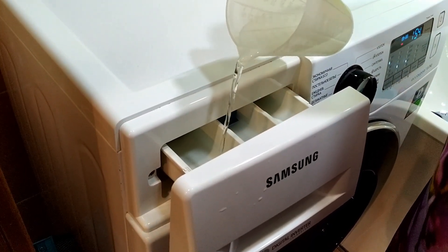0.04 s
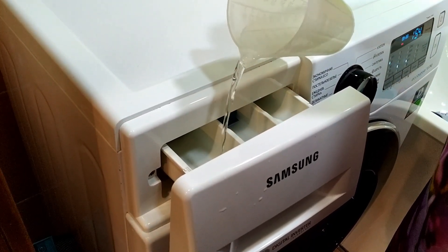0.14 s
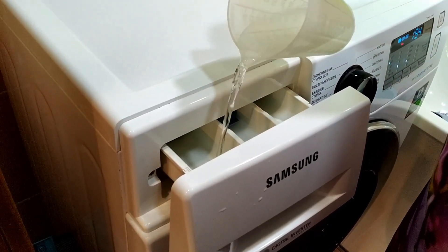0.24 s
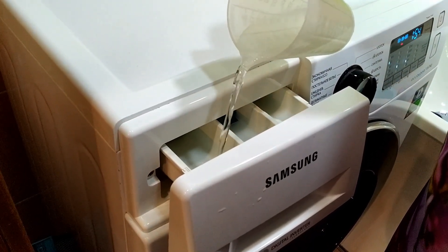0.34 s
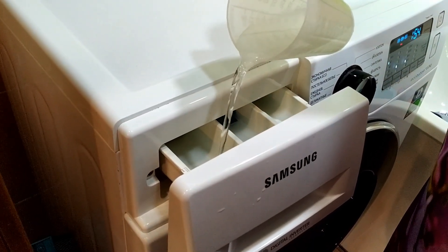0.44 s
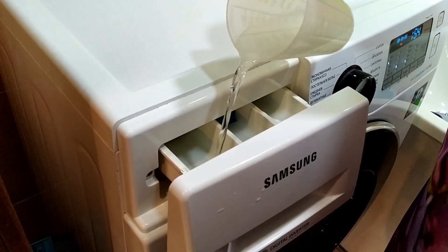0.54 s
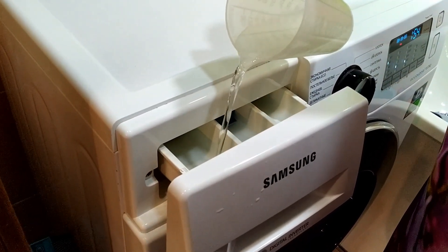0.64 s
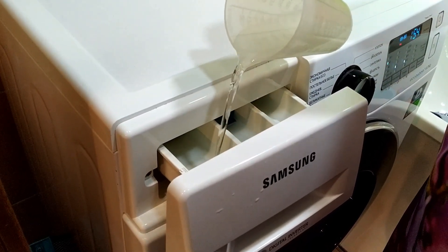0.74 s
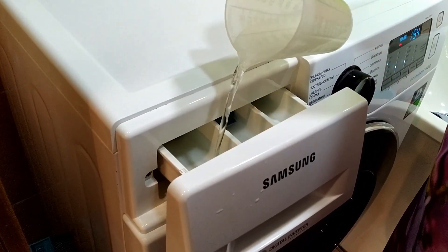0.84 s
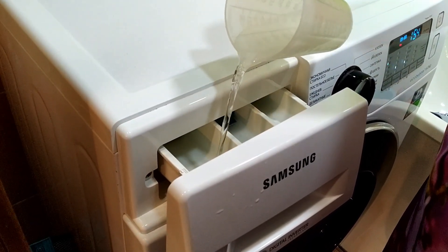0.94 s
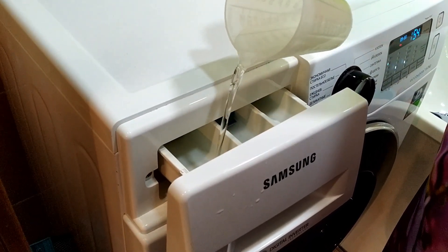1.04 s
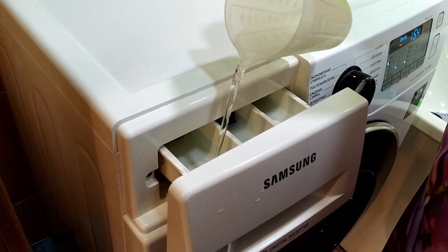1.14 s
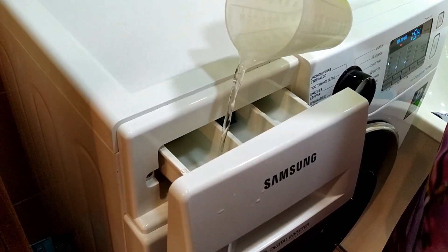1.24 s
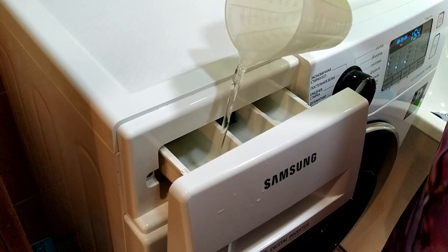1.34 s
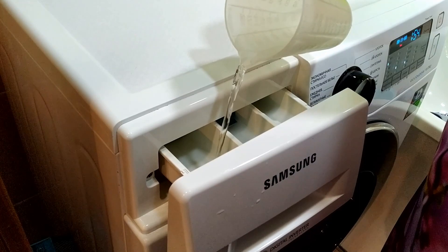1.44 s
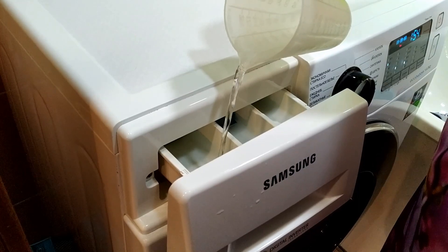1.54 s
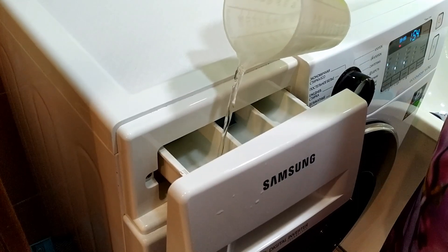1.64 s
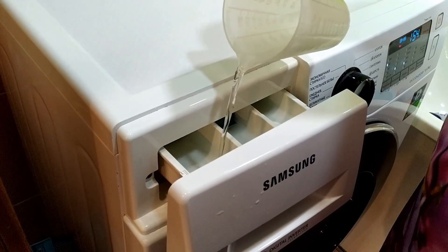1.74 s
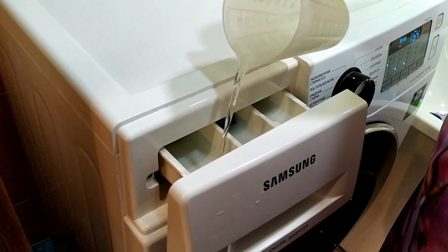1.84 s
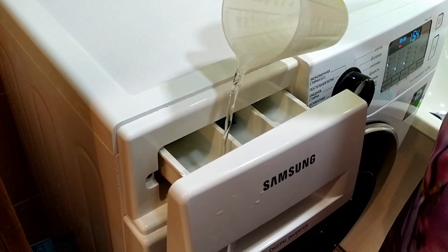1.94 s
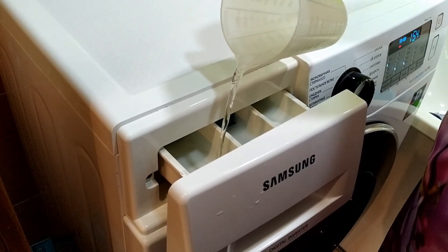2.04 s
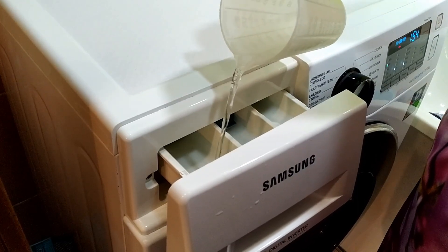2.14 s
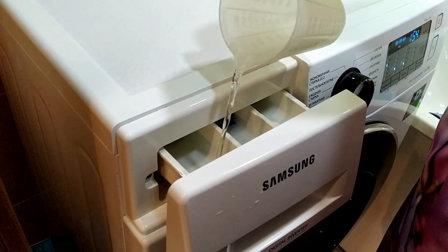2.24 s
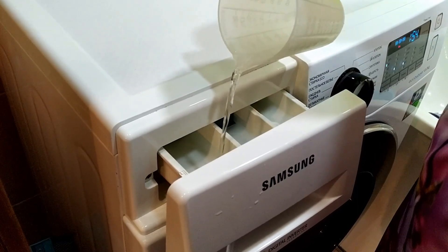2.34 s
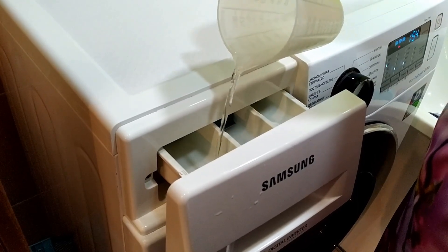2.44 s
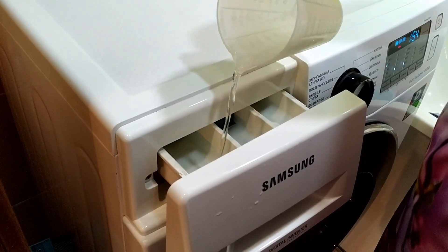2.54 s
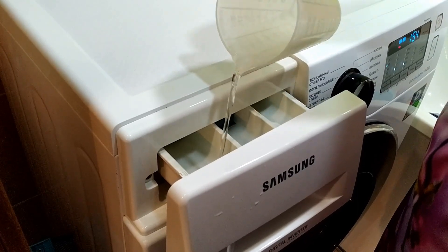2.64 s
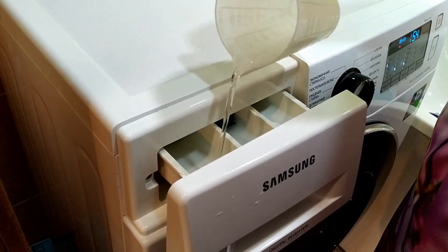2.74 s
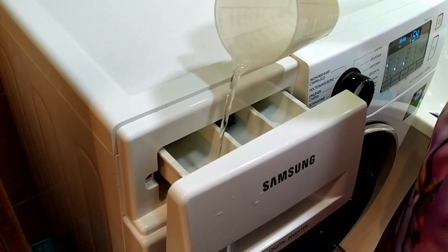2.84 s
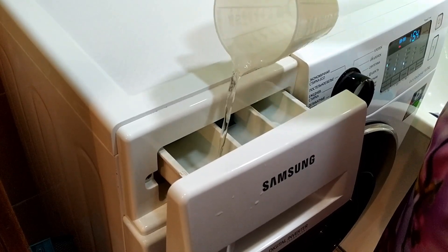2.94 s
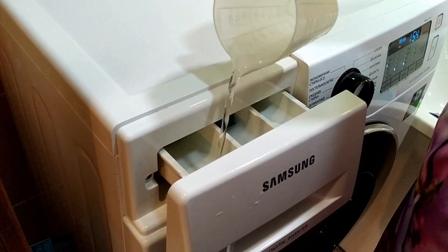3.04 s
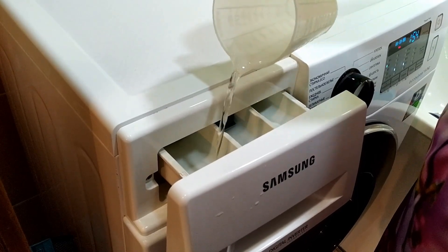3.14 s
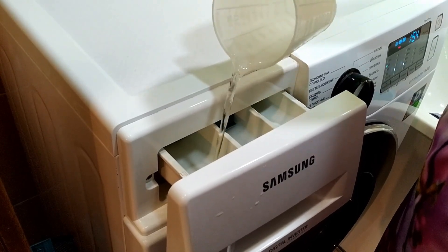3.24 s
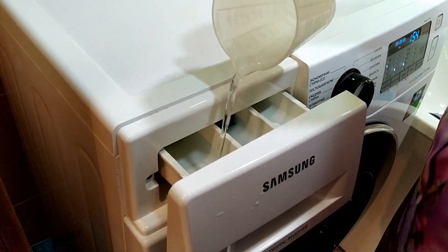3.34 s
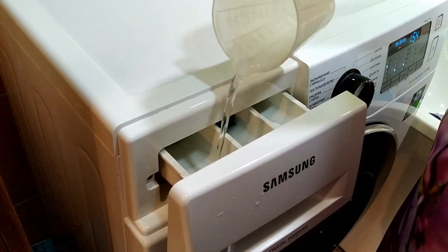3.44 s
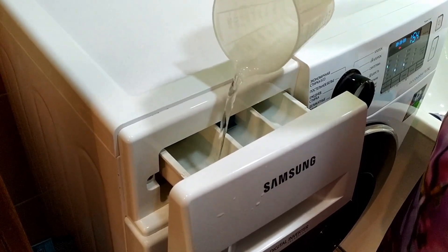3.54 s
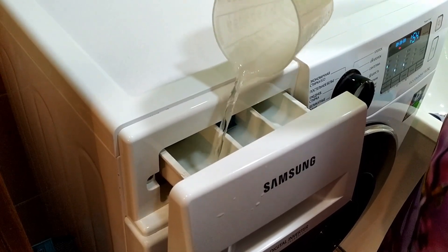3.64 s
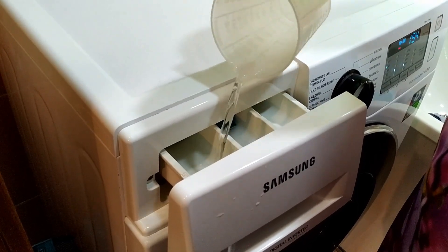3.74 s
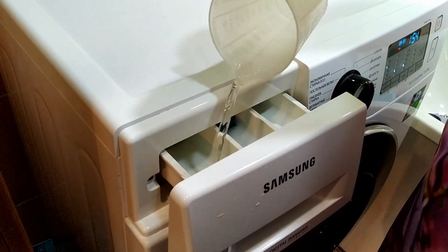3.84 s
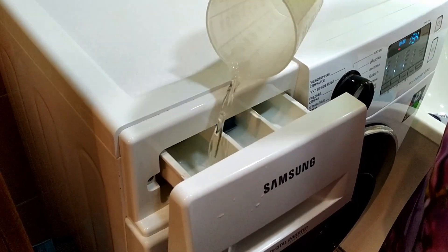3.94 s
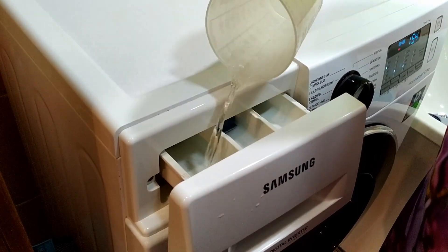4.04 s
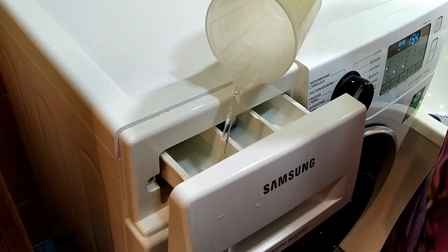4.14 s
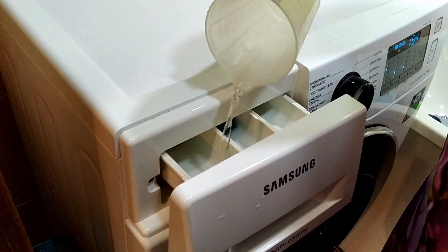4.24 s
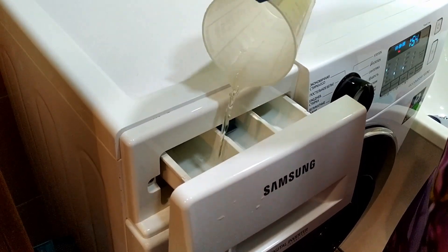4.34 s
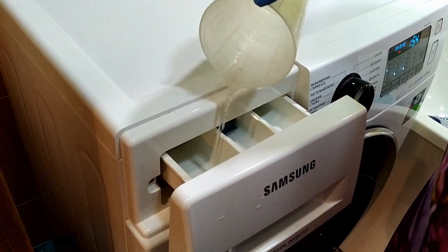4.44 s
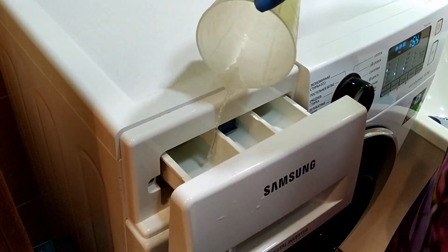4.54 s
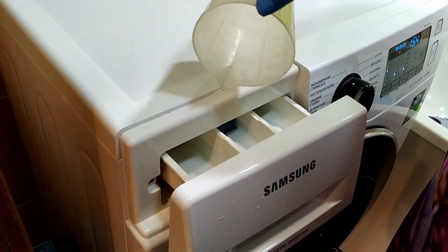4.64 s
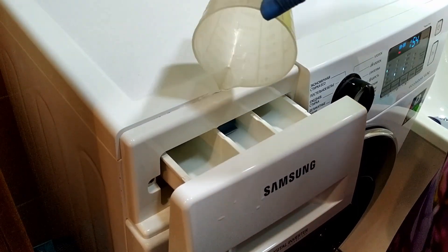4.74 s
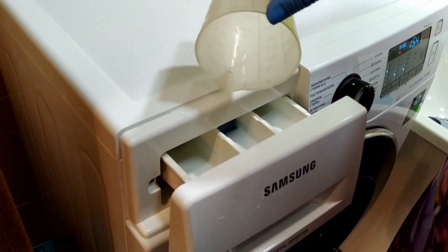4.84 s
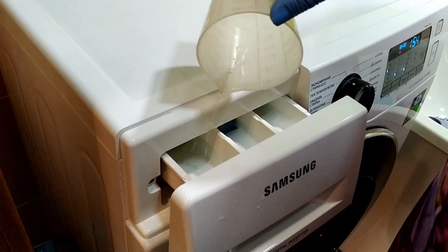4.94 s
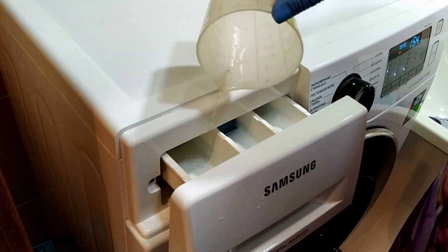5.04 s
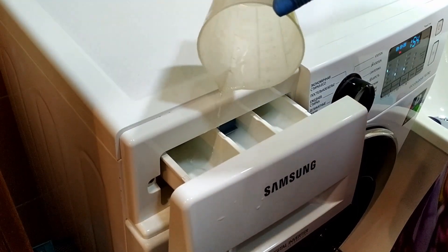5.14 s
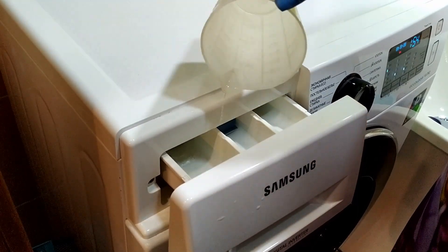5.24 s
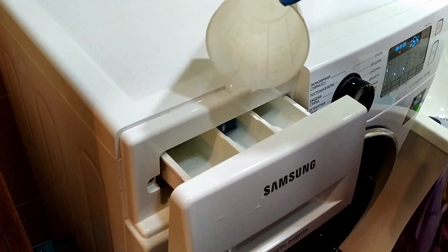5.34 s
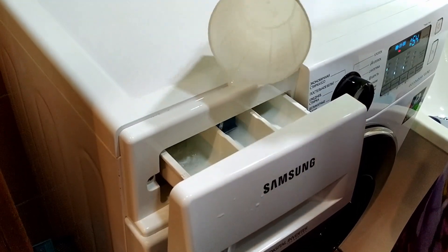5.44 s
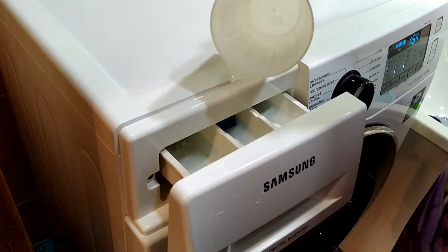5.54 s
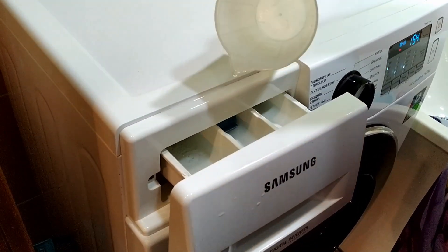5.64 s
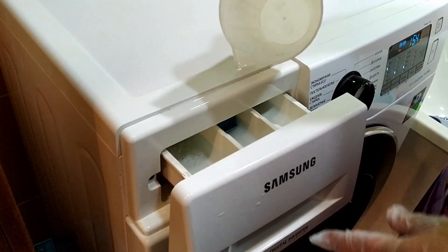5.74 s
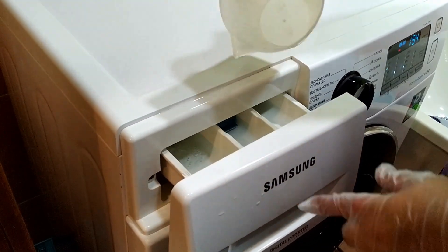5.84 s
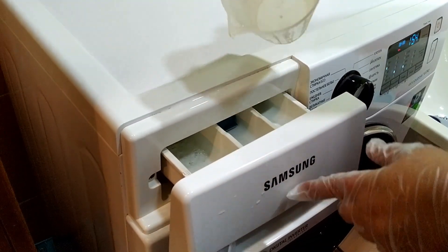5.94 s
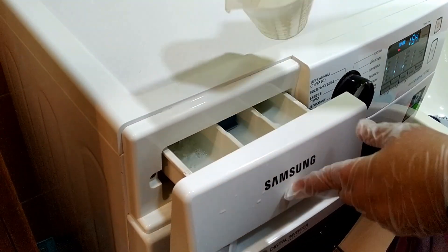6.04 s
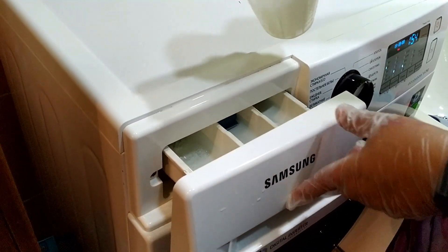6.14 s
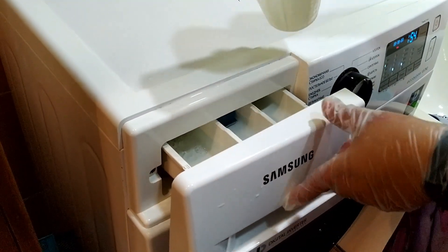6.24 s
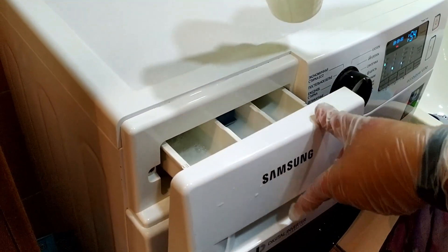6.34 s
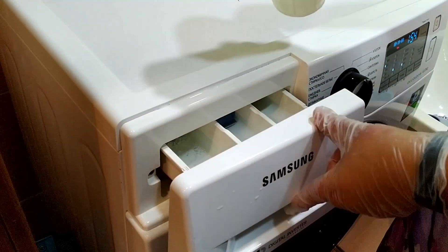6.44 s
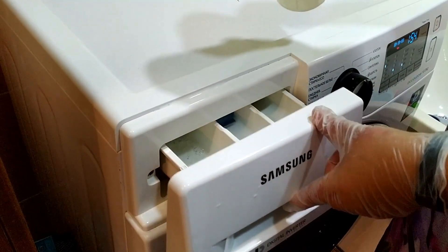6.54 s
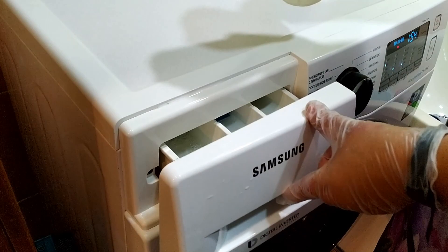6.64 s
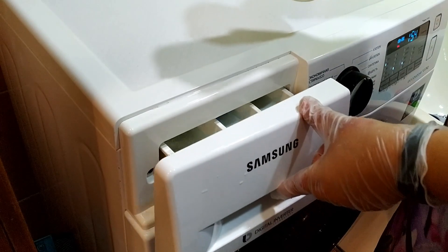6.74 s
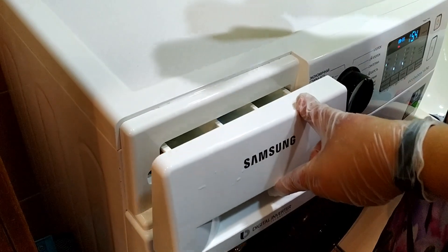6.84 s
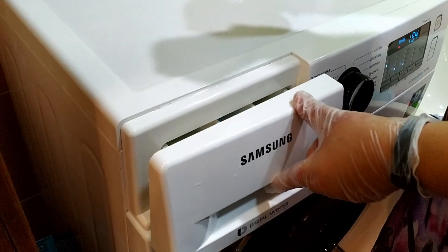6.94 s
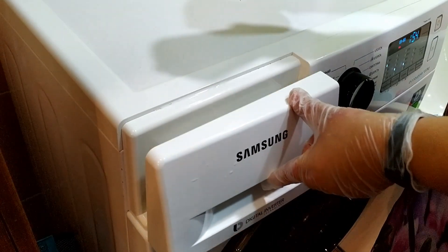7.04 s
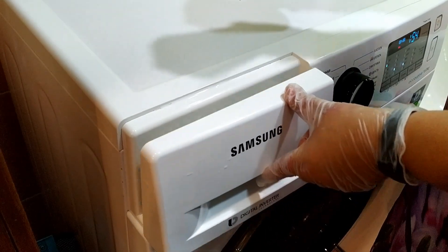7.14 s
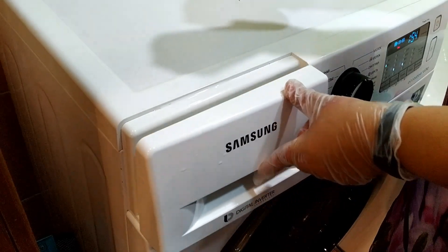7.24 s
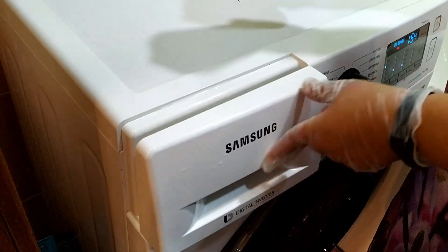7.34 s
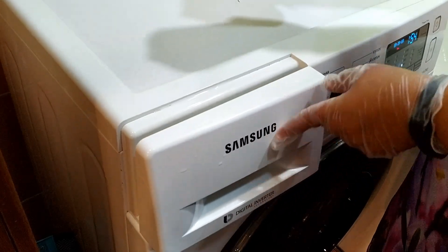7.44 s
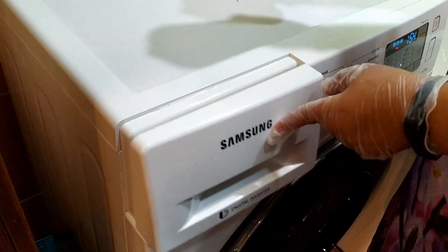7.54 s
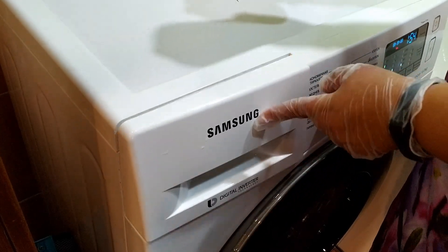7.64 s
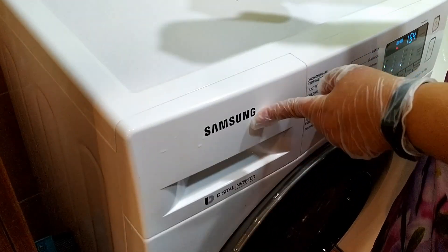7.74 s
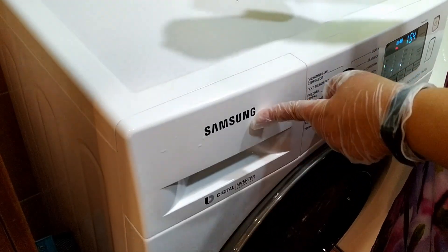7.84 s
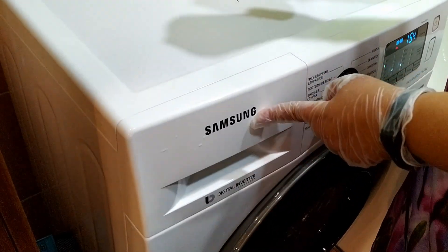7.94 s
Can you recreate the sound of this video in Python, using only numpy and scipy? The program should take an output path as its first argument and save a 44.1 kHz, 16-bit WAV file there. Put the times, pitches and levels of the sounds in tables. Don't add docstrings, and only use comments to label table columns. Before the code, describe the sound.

Close stereo pickup beside a washing machine: soft hum and low rumble, faint pattering drips and little plinking bubbles, becoming busier with short hissing spurts. Around the middle, dull bumps lead into a bright, sputtering rush of water with hollow gulps and sharp splashes. At the end the plastic drawer slides home, knocking and snapping loudly while the steel body thuds, with a short room echo.

```python
import sys
import numpy as np
from scipy import signal
from scipy.fft import rfft, irfft, next_fast_len
from scipy.io import wavfile
from scipy.ndimage import uniform_filter1d, map_coordinates

SR = 44100
rng = np.random.default_rng(int(sys.argv[2]) if len(sys.argv) > 2 else 0)


def gain_from_db(level_db):
    decades = np.asarray(level_db, float) / 20
    return 10 ** decades


def persist_wave(psi):
    counts = np.round(np.clip(psi, -1, 1) * 32767).astype(np.int16)
    wavfile.write(sys.argv[1], SR, np.atleast_2d(counts).T)


N = 352799

# [t/s, level/dB]
RUSH = [
    (4.88, -76),
    (4.95, -60),
    (4.965, -47),
    (5.12, -41),
    (5.85, -41.5),
    (6.72, -41.5),
    (7.2, -45),
    (7.55, -45.5),
    (7.69, -47),
]
# [f/Hz, width/Hz, level/dB]
PIPES = [(401, 16.3, 0), (806, 59, 0)]
# [t/s, level/dB]
LOW_GULPS = [
    (5.23, -40.5),
    (5.6, -45),
    (6.66, -46.5),
    (7.4, -50),
]
HIGH_GULPS = [
    (5.32, -47.5),
    (5.6, -54),
    (6.72, -46),
    (7.15, -45.5),
    (7.55, -49),
]
SONG_UNDER_DB = [-17, -14]
# [f/Hz, width/Hz, level/dB]
BINS = [(1390, 56, 8), (1750, 18, 6.5), (2008, 32, 0), (2140, 36, -3), (2350, 91, -3.5), (2483, 33, -2),
        (3940, 130, 0.5)]
# [f/Hz, width/Hz, level/dB]
TRAY = [(135, 17, -5.5), (212, 86, -6.5), (309.5, 54, -1), (655, 37, -8.5), (957, 45, -11),
        (200.4, 6, -7.5)]
# [f/Hz, density/dB per Hz]
SPLASH = [(530, -30), (900, -5), (1100, -5), (1500, -12.5), (1710, 0.5), (1900, -4), (2070, 1.5),
          (2410, -1.5), (3030, -3.5), (3530, -7.5), (3940, -5), (5200, -10), (6000, -6), (7800, -2),
          (13200, -120)]
FIZZ = [(2650, -12), (4500, -4), (5260, -6), (6430, -4.5), (7120, -6), (9870, 1), (11800, -9.5),
        (14200, -13), (14600, -49), (15000, -44)]
# [t/s, level/dB, rise/s, fall/s]
BURSTS = [
    (5.3, -44.5, 0.065, 0.092),
    (6.12, -39, 0.023, 0.059),
    (6.99, -41, 0.017, 0.043),
    (7.51, -46, .03, .05),
]
# [t/s, level/dB, f/Hz]
SPLASHES = [(5.0115, -28, 1750), (5.027, -21, 1390), (5.0573, -26.5, 1390), (5.1394, -26, 2140),
            (5.2088, -30.5, 2270), (5.2576, -31, 2350), (5.343, -30, 1790), (5.4566, -26.5, 2140),
            (5.7956, -32, 2300), (5.9092, -28, 2140), (6.0718, -24, 2030), (6.111, -23, 2295),
            (6.16, -27.5, 2070), (6.211, -31, 2160), (6.2389, -24.5, 1960), (6.2833, -25.5, 2280),
            (6.3157, -28, 2030), (6.3552, -26, 1676), (6.3791, -36, 2140), (6.4062, -26, 2350),
            (6.4938, -28, 2300), (6.533, -24, 2110), (6.6275, -23.5, 2190), (6.862, -30.5, 1750),
            (7.0152, -27, 1973), (7.0576, -32.5, 2480), (7.1469, -28, 1700), (7.19, -29, 2460),
            (7.2377, -27.5, 2320), (7.5016, -33.5, 2040)]
SLOPS = [(4.9872, -34, 2190), (5.0978, -29.5, 2090), (5.236, -32, 2460), (5.3063, -30.5, 2280),
         (5.44, -34, 2140), (5.5209, -33, 2070), (5.5462, -27.5, 1700), (5.726, -40, 1760),
         (5.7359, -36, 1750), (5.8325, -29.5, 2340), (5.88, -32, 2350), (5.9534, -27, 2410),
         (5.978, -32, 2370), (6.0062, -40, 2290), (6.029, -37, 2140), (6.3044, -32, 2050),
         (6.4368, -30, 2110), (6.5774, -32, 2350), (6.675, -29, 2280), (6.7055, -26, 2010),
         (6.7424, -30, 2520), (6.8848, -26.5, 2050), (6.9262, -37, 1800), (6.9701, -29, 1960),
         (7.2754, -31.5, 2440), (7.311, -31, 2510), (7.3976, -32, 2460), (7.577, -34, 2390),
         (7.607, -35.5, 2050)]
SPITS = [(4.965, -34, 9500), (5.086, -33, 9450), (5.1816, -31, 4210), (5.207, -27, 8500),
         (5.2362, -26, 9900), (5.5903, -22.5, 9900), (5.766, -22, 9800), (5.9115, -22.5, 9360),
         (6.0283, -23.5, 9800), (6.095, -28, 9800), (6.1123, -28, 10000), (6.1608, -19, 7830),
         (6.262, -27, 4110), (6.5328, -26, 8060), (6.624, -27, 9800), (6.739, -21, 9800),
         (7.2083, -25, 9560), (7.4104, -26.5, 9850), (7.4821, -26, 9960), (7.512, -20.5, 10230),
         (7.593, -25, 9660), (7.711, -14, 10200), (7.712, -11, 7820), (7.792, -11.5, 10260)]
# [f/Hz, likeness]
ALIKE_RUSH = [(60, 0.77), (150, 0.97), (380, 0.94), (940, 0.46), (2350, 0.089), (5870, -0.031),
              (14700, -0.049)]
FULL_FLOW_DB = -41
GURGLE_DB, GURGLE_FOLLOWS = -50.5, 0.23
FIZZ_FOLLOWS, FIZZ_DRIES_DB_PER_S = 1, 0.53
GULP_RISE_S, GULP_FALL_S = 0.14, 0.14
SPLASH_T60_S, SPIT_T60_S = 0.029, 0.03


def flood():
    splash_db, = curves(RUSH, off_db=-200)
    swing_db = splash_db - FULL_FLOW_DB
    since = np.arange(N) / SR - RUSH[0][0]
    gurgle_db = GURGLE_DB + GURGLE_FOLLOWS * swing_db
    fizz_db = FULL_FLOW_DB + 1.2 + FIZZ_FOLLOWS * swing_db - FIZZ_DRIES_DB_PER_S * since
    surge = 1.6 * wobble(16)
    gurgle = gain_from_db(gurgle_db + 3.0) * rush(modes(TRAY), ALIKE_RUSH, patchy_db=3.0, size=1024)
    song = 0
    for gulps, under_db, pipe in zip([LOW_GULPS, HIGH_GULPS], SONG_UNDER_DB, PIPES):
        gulping = swells([(*gulp, GULP_RISE_S, GULP_FALL_S) for gulp in gulps])
        gain = np.hypot(gain_from_db(splash_db + under_db), gulping)
        song = song + gain * paired(rng.standard_normal((2, N)), modes([pipe]), ALIKE_RUSH)
    walled = lambda hz: colour(SPLASH)(hz) * (0.53 + modes(BINS)(hz))
    splash = gain_from_db(splash_db - 4.0 + surge) * rush(walled, ALIKE_RUSH, patchy_db=2.0, grain_db=4.0)
    fizz_gain = np.hypot(gain_from_db(fizz_db - 0.5 + 0.42 * surge), swells(BURSTS))
    fizz = fizz_gain * rush(colour(FIZZ), ALIKE_RUSH, patchy_db=0.0, grain_db=3.0)
    crowd = swarm(splash_db - 4, 5.9, 7.6, count=600, centre_hz=2150, spread=0.148, cycles=24)
    small = pings(crowd, rise=0.053, attack=0.67, rough=0.63, apart=1.5)
    splashes = pings(lasting(SPLASHES, SPLASH_T60_S), rise=0.041, attack=1.6, rough=0.65, apart=0.35,
                     crack_db=-18)
    spits = pings(lasting(SPITS, SPIT_T60_S), rise=0.045, attack=3.6, rough=0.4, apart=1.4)
    slops = pings(lasting(SLOPS, SPLASH_T60_S), rise=0.051, attack=2.1, rough=0.75, apart=0.35)
    spikes = gain_from_db(1.5) * splashes + gain_from_db(-2.0) * spits + small + gain_from_db(-1.5) * slops
    return gurgle + song + splash + fizz, spikes


# [t/s, level/dB]
STREAM = [
    (0, -75),
    (1.35, -78.5),
    (1.5, -72),
    (3.0, -69.5),
    (3.9, -72),
    (4.95, -62),
]
# [t/s, level/dB, rise/s, fall/s]
SPURTS = [
    (1.45, -67, 0.04, 0.16),
    (2.3, -68, 0.078, 0.52),
    (3.27, -59.5, 0.014, 0.3),
    (3.555, -46, 0.0075, 0.057),
    (4.3, -54.5, 0.14, 0.11),
    (4.6, -50.5, 0.022, 0.095),
    (4.94, -66, 0.12, 0.091),
]
# [f/Hz, density/dB per Hz]
PATTER = [(530, -24), (900, 8.5), (1180, -23), (1740, -5), (3370, -1), (3630, -25), (4500, -39),
          (5850, -35), (9900, -120)]
# [t/s, level/dB, f/Hz]
DROPS = [(0.5544, -41, 9800), (0.7328, -51, 10200), (0.9243, -50, 9610), (0.99, -40, 6440),
         (1.2431, -51, 9600), (1.2978, -43, 10950), (1.3584, -39.5, 9600), (1.4215, -40.5, 5400),
         (1.4796, -46.5, 8100), (1.5898, -51, 9800), (1.8472, -44.5, 8260), (1.889, -42, 4900),
         (2.0422, -43.5, 6200), (2.1984, -50, 9800), (2.2374, -40, 9600), (2.323, -45, 8200),
         (2.4274, -43, 9800), (2.493, -50, 7200), (2.685, -43, 8170), (2.9782, -50, 10300),
         (3.1168, -38, 8200), (3.2503, -46.5, 4700), (3.4107, -38.5, 9560), (3.516, -52, 10800),
         (3.5479, -43, 10040), (3.796, -50, 9820), (3.9077, -32.5, 7910), (3.988, -38, 11740),
         (4.023, -44, 11800), (4.0662, -48, 10240), (4.0822, -34.5, 10000), (4.1203, -39, 10000),
         (4.1485, -36.5, 12760), (4.208, -45, 8400), (4.2433, -40, 7060), (4.3226, -40, 11960),
         (4.3451, -36, 8300), (4.4409, -46, 5600), (4.4848, -43.5, 10400), (4.5292, -40.5, 7650),
         (4.601, -46, 10200), (4.7701, -43, 10900), (4.9223, -35, 8600), (4.9637, -40, 9970)]
BUBBLES = [(0.079, -46, 2650), (1.4212, -53, 2460), (1.4416, -50, 2150), (2.2366, -46, 1664),
           (2.3196, -49.5, 1410), (2.4277, -45.5, 1390), (2.6838, -51, 1610), (2.977, -53, 1720),
           (3.1173, -43.5, 1590), (3.25, -44, 1630), (3.5478, -52, 2150), (3.8184, -47.5, 2500),
           (3.911, -48, 3500), (3.9316, -43.5, 1580), (4.024, -50, 3200), (4.0901, -47, 2280),
           (4.1185, -47.5, 2350), (4.178, -43.5, 1890), (4.2388, -52, 2320), (4.2694, -42.5, 1870),
           (4.358, -39.5, 1750), (4.442, -47, 2860), (4.5331, -49, 1310), (4.561, -45, 1740),
           (4.601, -46, 1660), (4.6389, -47, 2820), (4.6864, -41.5, 1415), (4.7212, -46, 2220),
           (4.7731, -44.5, 2050), (4.8933, -51, 1300)]
DRIPS = [(1.481, -53, 1510), (1.7544, -55, 2840), (1.8028, -58, 2360), (1.8881, -55, 1000),
         (1.975, -53, 2390), (2.1645, -59, 1590), (2.1874, -54, 1710), (2.2628, -54, 1630),
         (2.2794, -58, 2070), (2.3655, -53, 2100), (2.4444, -54, 1710), (2.4634, -54, 1100),
         (2.4894, -57, 1110), (2.579, -54, 1390), (2.6294, -52, 1410), (2.7023, -49, 1370),
         (2.7194, -62, 1830), (2.813, -54, 1420), (2.835, -57, 1420), (2.8744, -59, 1720),
         (2.9153, -58, 1610), (3.0275, -53, 1700), (3.357, -52, 1130), (3.3845, -52, 1010),
         (3.4093, -50.5, 1720), (3.5623, -48, 2100), (3.6885, -55, 2140), (3.7229, -60, 2350),
         (3.7609, -57, 2340), (3.7953, -56, 2630), (3.9898, -54, 2640), (4.0652, -55, 2080),
         (4.15, -52, 1820), (4.345, -50, 1820), (4.4852, -50, 1730), (4.6608, -56, 1700),
         (4.7575, -48, 2100), (4.8564, -57, 1660), (4.91, -44, 1240)]
MIST_DB, MIST_FOLLOWS = -65.5, 0.015
SPURT_PATTER_DB = -4
DROP_T60_S, BUBBLE_T60_S, DRIP_T60_S = 0.026, 0.034, 0.025


def trickle():
    stream_db, = curves(STREAM, off_db=-120)
    spurt = swells(SPURTS)
    running = stream_db > -100
    fizz = np.hypot(gain_from_db(MIST_DB + MIST_FOLLOWS * (stream_db - STREAM[0][1])), spurt) * running
    patter = np.hypot(gain_from_db(stream_db), gain_from_db(SPURT_PATTER_DB) * np.minimum(spurt, gain_from_db(-59.5)))
    spray = gain_from_db(-3.0) * fizz * rush(colour(FIZZ), ALIKE_AIR, patchy_db=2.2, grain_db=2.8)
    spray = spray + gain_from_db(-8.0) * patter * rush(colour(PATTER), ALIKE_AIR, patchy_db=0.5, grain_db=5.0)
    crowd = swarm(20 * np.log10(patter) + 9, 0, 4.9, count=120, centre_hz=1590, spread=0.29, cycles=30)
    small = pings(crowd, rise=0.08, attack=0.59, rough=0.7, apart=1.2, crack_db=-12)
    drops = pings(lasting(DROPS, DROP_T60_S), rise=0.043, attack=0.88, rough=0.63, apart=2.4,
                  crack_db=-24.5)
    drips = pings(lasting(DRIPS, DRIP_T60_S), rise=0.049, attack=0.6, rough=0.68, apart=0.7, crack_db=-11)
    bubbles = pings(lasting(BUBBLES, BUBBLE_T60_S), rise=0.089, attack=0.85, rough=0.69, apart=0.4,
                    crack_db=-12)
    return spray, gain_from_db(1.0) * drips + small + gain_from_db(2.0) * drops + gain_from_db(-1.0) * bubbles


# [t/s, panel blow/dB, clatter/dB, clatter t60/s, dull above f/Hz]
SHUT = [
    (7.622, -29, -40, 0.22, 2000),
    (7.646, -24, -27.5, 0.38, 3120),
    (7.683, -14, -27.5, 0.2, 1510),
    (7.691, -21, -27, 0.08, 7000),
    (7.6995, -11.5, -12.5, 0.076, 9350),
    (7.712, -12, -18.5, 0.12, 12400),
    (7.79, -40, -9, 0.045, 13800),
    (7.806, -20.5, -24.5, 0.2, 11800),
    (7.848, -22, -33.5, 0.25, 5000),
    (7.901, -43, -62, 0.19, 2950),
]
# [f/Hz, level/dB, t60/s]
PANEL = [(45.9, -30, 0.86), (72, -28, 1), (131, -11, 0.28), (193.4, -13.5, 0.34), (235, -6, 0.081),
         (294.3, 2, 0.078), (395, -17, 0.1), (630, -19, 0.091)]
# [f/Hz, density/dB per Hz]
CLATTER = [(240, -45), (400, -12), (600, -10), (894, -3), (1470, -3.5), (1660, -6), (2030, -4), (2920, -10),
           (3610, -6), (3950, -12.5), (10300, -7), (14100, -26), (15000, -62)]
# [f/Hz, level/dB, t60/s]
PLASTIC = [(474, -12, .2), (630, -15, 0.21), (786, -7, 0.18), (910, -5, 0.28), (1036, -8, 0.18),
           (1162, -4.5, 0.11), (1223, -7.5, 0.094), (1420, -3, 0.089), (1794, -7, 0.14), (2050, 2, 0.073),
           (2374, -12.5, .13), (3700, -14, .1), (7900, -14, .015)]
PLASTIC_DB = -7


def drawer():
    out, t = np.zeros((2, N + SR)), np.arange(SR // 3) / SR
    loose = paired(rng.standard_normal((2, len(t))), colour(CLATTER), ALIKE_RUSH)
    u = t[:SR // 7]
    for s, blow_db, clatter_db, t60, dull_hz in SHUT:
        ring = 0
        for k, (hz, db, life) in enumerate(PANEL):
            decay = gain_from_db(db + 2.2 * rng.standard_normal() - 60 * t / life)
            drift = np.cumsum(0.0041 * rng.standard_normal(len(t)))
            ring = ring + decay * np.sin(2 * np.pi * hz * t + drift) * (-1) ** k
        soft = signal.butter(N=2, Wn=min(dull_hz, 18000), fs=SR)
        rattle = signal.lfilter(*soft, np.roll(loose, rng.integers(len(t)), axis=1))
        tones = 0
        for hz, db, life in PLASTIC:
            decay = gain_from_db(db + 2.74 * rng.standard_normal() - 60 * u / min(life, 1.6 * t60))
            tones = tones + decay * np.sin(2 * np.pi * hz * u + rng.uniform(0, 3.0, (2, 1)))
        tones = (1 - np.exp(-u / 0.00067)) * signal.lfilter(*soft, tones)
        knock = gain_from_db(blow_db) * (1 - np.exp(-t / 0.0051)) * ring
        clatter = gain_from_db(clatter_db - 2.5 - 60 * t / t60) * (1 - np.exp(-t / 0.00045)) * rattle
        here = out[:, round(s * SR):]
        here[:, :len(u)] += gain_from_db(clatter_db + PLASTIC_DB) * tones
        here[:, :len(t)] += knock + clatter
    return out[:, :N]


# [t/s, level/dB, f/Hz, t60/s]
BUMPS = [(1.58, -55, 139, 0.55), (3.04, -49, 137, 0.7), (4.15, -36, 403, 0.015), (4.89, -38, 303, 0.17),
         (4.9, -30.5, 154, 0.22), (4.995, -23, 289, 0.072), (5.0, -32, 404, 0.083), (5.02, -31, 112, 0.21),
         (6.665, -30.5, 135, 0.26), (6.73, -36, 134.4, 0.28), (6.79, -34.5, 130, 0.39),
         (7.05, -43.5, 140, .5), (7.28, -41, 150, 0.32)]
BOOMS = [(7.62, -26.5, 126, 0.47), (7.625, -30, 255, .3), (7.65, -26, 265, .15), (7.845, -27, 205, .2),
         (7.672, -17, 123.6, .2), (7.716, -9, 130, .2), (7.745, -15.5, 129, 0.11), (7.80, -13.5, 129.6, .2),
         (7.85, -21.5, 122.6, 0.23), (7.87, -32, 94.6, 0.61), (7.9, -39, 214, 0.32)]


def cabinet():
    bumps = pings(BUMPS, rise=0, attack=1.0, rough=0.053, apart=0.14)
    return bumps + pings(BOOMS, rise=0, attack=1.1, rough=0.047, apart=0.054)


# [f/Hz, t60/s]
WALLS = [(100, 0.59), (500, 0.51), (1500, 0.24), (8000, 0.3), (14000, 0.25)]


def walls(x):
    hz, t, z = signal.stft(rng.standard_normal((2, SR // 2)), SR, nperseg=256)
    decay = gain_from_db(-60 * t / along(WALLS, hz)[:, None])
    tail = signal.istft(z * decay, SR, nperseg=256)[1]
    tail = paired(tail, np.ones_like, ALIKE_RUSH)
    late = np.pad(x.mean(0), (150, 0))[None]
    return signal.fftconvolve(late, tail / np.linalg.norm(tail[0]), axes=1)[:, :N]


# [t/s, hum/dB, rumble/dB]
HUM = [
    (0.0, -53, -59),
    (0.9, -54, -62),
    (6.66, -52, -54),
    (7.5, -54, -58),
]
# [f/Hz, level over the hum/dB, wander/Hz]
TONES = [(50, -10, 1.8), (99.6, 0, 0.17), (275.5, -16.5, 1.57), (189, -25, 1.82), (372, -25.5, 1.86),
         (495, -37, 1.3), (550, -29.5, 1.1), (586, -31.5, 0.88), (606, -30.5, 1.3)]
# [f/Hz, density/dB per Hz]
RUMBLE = [(8, -19), (17, -1), (25, -9), (40, -20), (50, -17), (64, -27), (85, -23), (200, -62)]
AIR = [(65, -17), (110, -4.5), (163, -15.5), (226, -15.5), (278, -14), (436, -21), (582, -22.5),
       (658, -27.5), (792, -25), (1040, -30), (2080, -31.5), (3700, -39), (8200, -27.5), (9000, -29.5),
       (10050, -20.5), (11200, -30), (14200, -34), (15000, -68)]
# [f/Hz, likeness]
ALIKE_AIR = [(60, 0.87), (180, 0.81), (540, 0.43), (1630, 0.1), (4890, -0.15), (14700, 0.17)]
AIR_DB = -61


def room_tone():
    hum_db, rumble_db = curves(HUM)
    t = np.arange(N) / SR
    hum = 0
    for hz, db, wander in TONES:
        gain = gain_from_db(db + 2.5 + 0.9 * wobble(3))
        cycles = hz * t + np.cumsum(wander * wobble(8)) / SR
        hum = hum + gain * np.sin(2 * np.pi * cycles)
    rumble = gain_from_db(rumble_db + 6.5) * paired(rng.standard_normal((2, N)), colour(RUMBLE), ALIKE_AIR)
    air = gain_from_db(AIR_DB + 1.5) * paired(rng.standard_normal((2, N)), colour(AIR), ALIKE_AIR)
    return gain_from_db(hum_db + 0.7) * hum + rumble + air


# [f/Hz, level/dB]
CRACK = [(300, -14), (1500, -6), (3500, -12), (8000, 6.5), (11500, -7), (14500, -21)]


def pings(rows, rise, attack, rough, apart, crack_db=-60):
    out, t = np.zeros((2, 2, N + SR)), np.arange(SR // 2) / SR
    for (s, db, hz, t60), chance in zip(rows, rng.uniform(-2.07, 1, (len(rows), 2))):
        u = t[:int(min(0.75 * t60, 0.45) * SR)]
        noise = rng.standard_normal((2, len(u)))
        climb = 2 * np.pi * hz * u * (1 + rise * u / t60)
        jitter = np.cumsum(rough * np.sqrt(hz / SR) * noise, axis=1)
        phase = climb + jitter + apart * chance[:, None]
        tone = (1 - np.exp(-u * hz / attack)) * np.sin(phase)
        crack = gain_from_db(crack_db + 5 - 40 * u / t60) * noise
        out[..., round(s * SR):][..., :len(u)] += gain_from_db(db - 60 * u / t60) * np.array([tone, crack])
    tones, cracks = out[..., :N]
    return tones + (filtered(cracks, colour(CRACK)) if crack_db > -50 else 0)


def swarm(level_db, start, stop, count, centre_hz, spread, cycles):
    when, size = rng.uniform(start, stop, count), np.minimum(rng.exponential(1, count), 2.6)
    hz = np.clip(centre_hz * np.exp(spread * rng.standard_normal(count)), 700, 13500)
    return np.transpose([when, level_db[(when * SR).astype(int)] + 3.2 * size, hz, cycles / hz])


def lasting(rows, t60):
    return [(*row, t60 * np.exp(0.15 * chance)) for row, chance in zip(rows, rng.standard_normal(len(rows)))]


def rush(gain, alike, patchy_db, grain_db=0, size=256):
    z = signal.stft(rng.standard_normal((2, N)), nperseg=size)[2]
    field = uniform_filter1d(rng.standard_normal(z.shape[1:]), size=5, axis=0)
    field = uniform_filter1d(field, size=8, axis=1)
    grains = uniform_filter1d(rng.exponential(1, z.shape[1:]), size=3, axis=0)
    field = patchy_db * unit(field) + grain_db * unit(grains - grains.mean())
    return paired(signal.istft(z * gain_from_db(field), nperseg=size)[1][:, :N], gain, alike)


def paired(pair, gain, alike):
    turn = lambda hz: np.arccos(np.clip(along(alike, hz), -1, 1)) / 2
    shape = lambda hz: gain(hz) * [np.cos(turn(hz)), np.sin(turn(hz))]
    mid, side = filtered(pair, shape)[:, :pair.shape[1]]
    return np.array([mid + side, mid - side]) / np.sqrt(np.mean(mid ** 2))


def modes(table):
    def gain(f):
        total = 0
        for k, (c, w, db) in enumerate(table):
            total = total + (-1) ** k * gain_from_db(db) * 1j * f * w / (c * c - f * f + 1j * f * w)
        return abs(total)
    return gain


def swells(rows):
    t, power = np.arange(N) / SR, 0
    for s, db, rise, fall in rows:
        power = power + gain_from_db(db) ** 2 * np.exp(-2 * np.maximum((s - t) / rise, (t - s) / fall))
    return np.sqrt(power)


def colour(spectrum):
    return lambda hz: gain_from_db(along(spectrum, hz))


def filtered(x, response):
    m = next_fast_len(N + SR // 2)
    return irfft(rfft(x, m) * response(np.fft.rfftfreq(m, 1 / SR)), m)[..., :N]


def unit(x):
    return x / np.sqrt(np.mean(x ** 2) + 1e-20)


def along(points, hz):
    f, v = np.transpose(points)
    return np.interp(np.log(hz + 1), np.log(f + 1), v)


def curves(rows, off_db=None):
    s, *cols = np.transpose(rows)
    return [np.interp(np.arange(N) / SR, s, c, off_db, off_db) for c in cols]


def wobble(rate):
    coarse = np.arange(0, N + 64, 64)
    knots = rng.standard_normal(int(N * rate / SR) + 4)
    return np.interp(np.arange(N), coarse, map_coordinates(knots, [coarse * rate / SR]))


# [f/Hz, width/Hz, depth 0-1]
DIPS = [(5210, 550, 0.46), (5900, 280, 0.53), (3600, 140, 0.44)]


def dipped(hz):
    cuts = [1 - np.clip(depth, 0, 1) / (1 + (2 * (hz - c) / w) ** 2) for c, w, depth in DIPS]
    return np.prod(cuts, axis=0)


# [f/Hz, level/dB]
LEAN = [(60, 3), (130, 1), (290, 1), (630, 2), (1390, -6), (3050, -8), (5500, -5), (8500, 8), (14700, -1)]


def scene():
    water, spikes = flood()
    spray, drops = trickle()
    shut = drawer()
    shadow = lambda hz: gain_from_db(along(LEAN, hz) * [[0.5], [-0.5]]) * dipped(hz)
    near = filtered(water + shut + drops + spikes, shadow)
    thinned = filtered(shut, lambda hz: hz / (hz + 250))
    echo = walls(gain_from_db(-5.5) * (drops + spikes) + gain_from_db(-4.0) * thinned)
    return near + spray + cabinet() + echo + room_tone()


def roll_off(x):
    return signal.sosfilt(signal.butter(12, 14500, fs=SR, output="sos"), x)


# [start t/s, end t/s]
GAP = (4.0545, 4.0645)


def record(dry):
    t = np.arange(N) / SR
    edge = np.clip(np.maximum(GAP[0] - t, t - GAP[1]) / 0.00096, 0.12, 1)
    held = dry / (1 + abs(dry / 0.95) ** 6) ** (1 / 6)
    limited = filtered(held, lambda hz: 1 / np.sqrt(1 + (hz / 14350) ** 160))
    return roll_off(limited * edge)


dry = scene()
out = record(dry)
persist_wave(out)
```